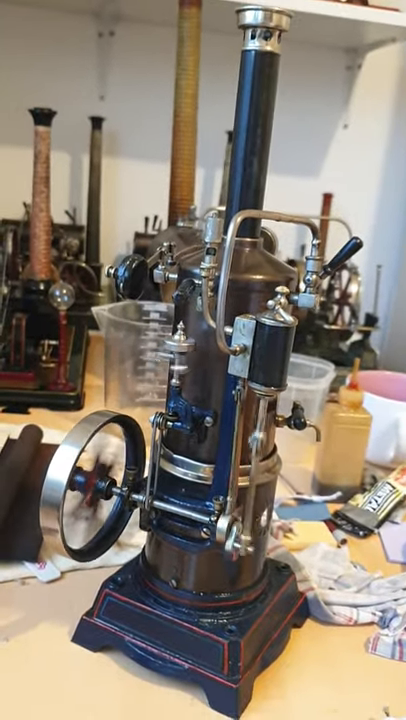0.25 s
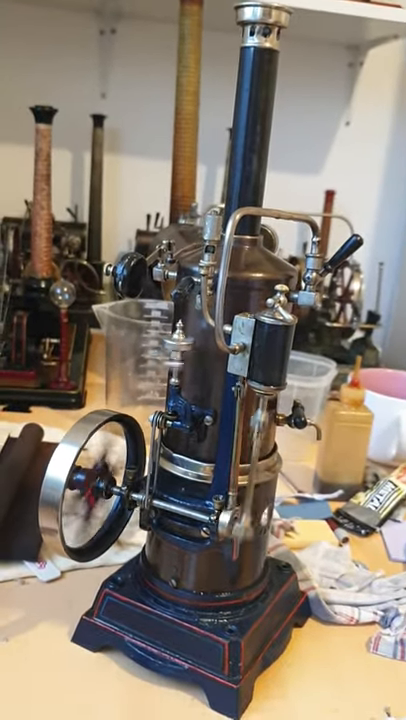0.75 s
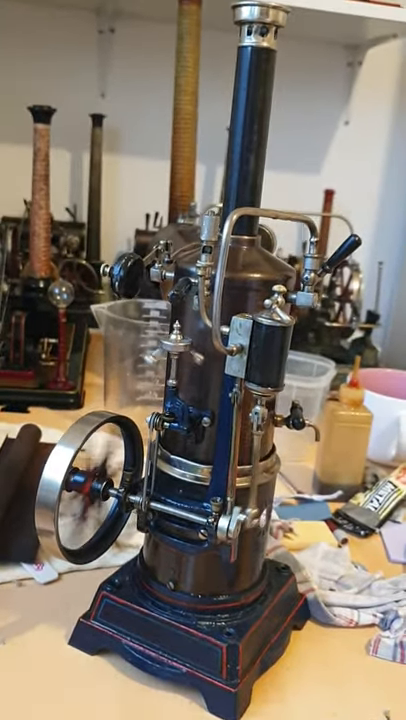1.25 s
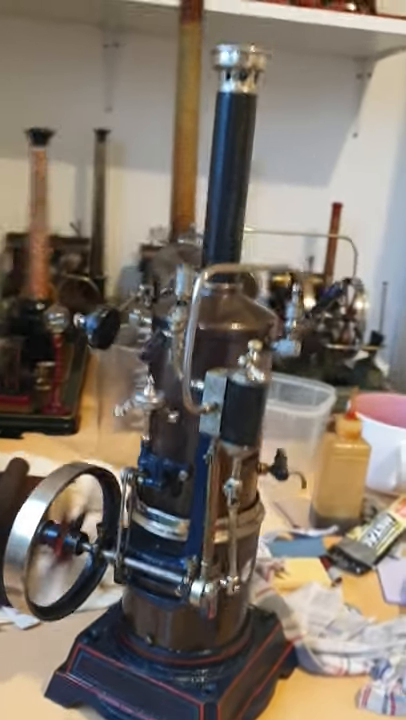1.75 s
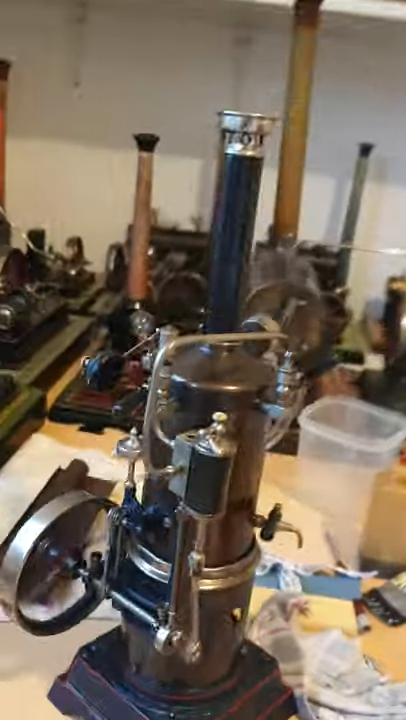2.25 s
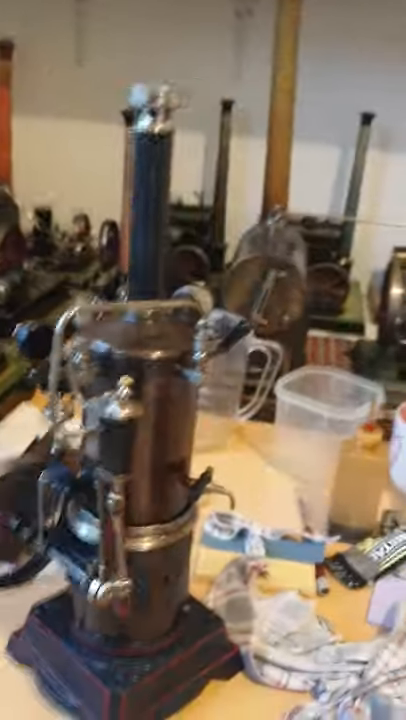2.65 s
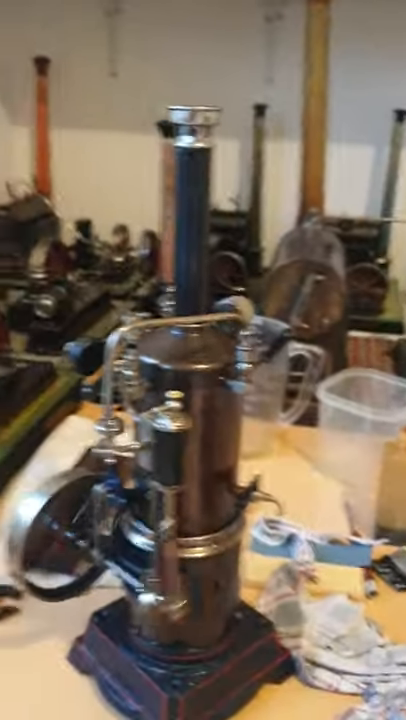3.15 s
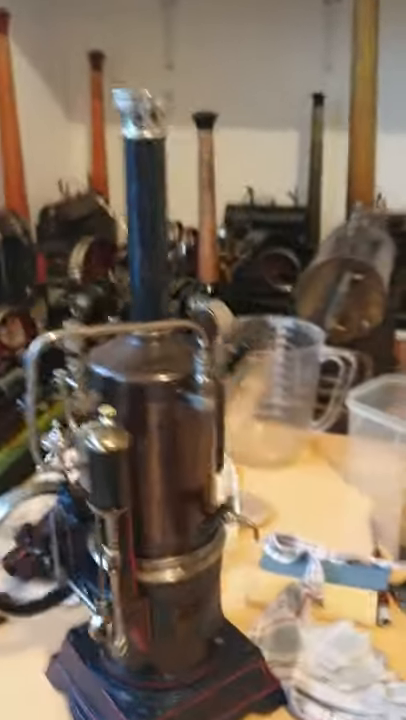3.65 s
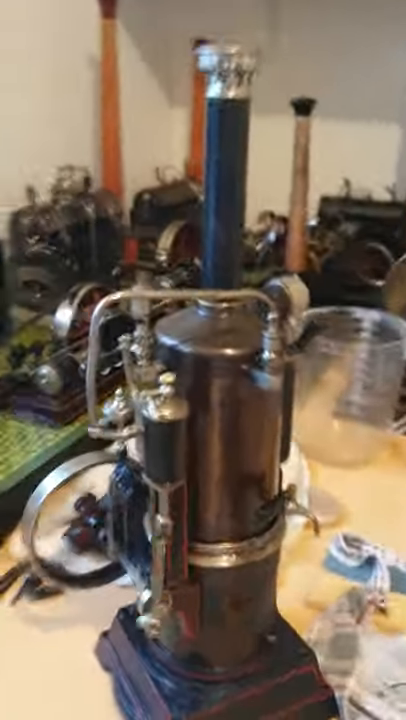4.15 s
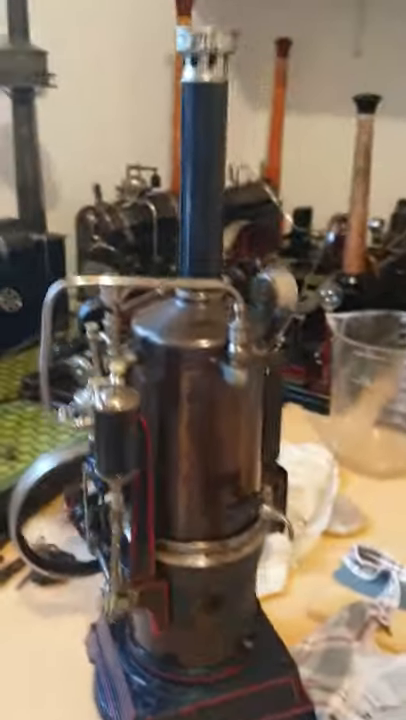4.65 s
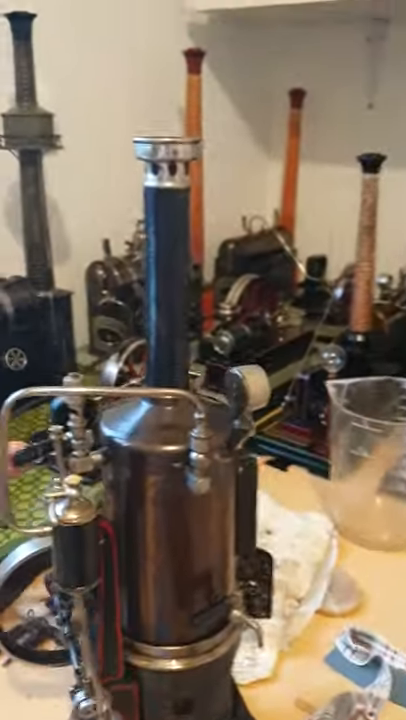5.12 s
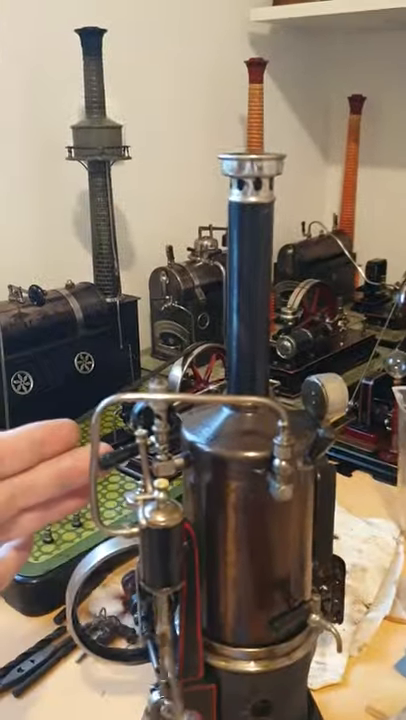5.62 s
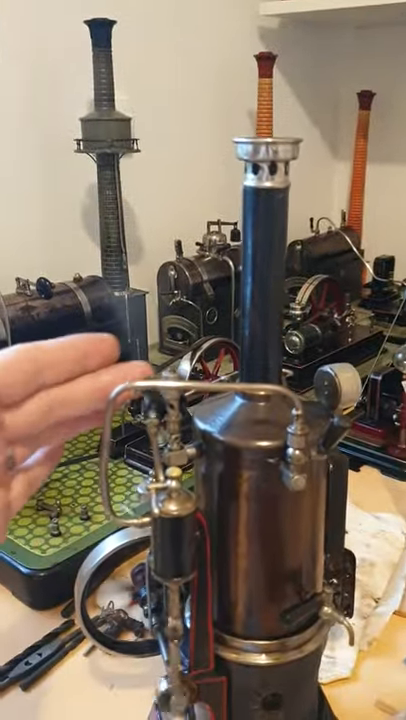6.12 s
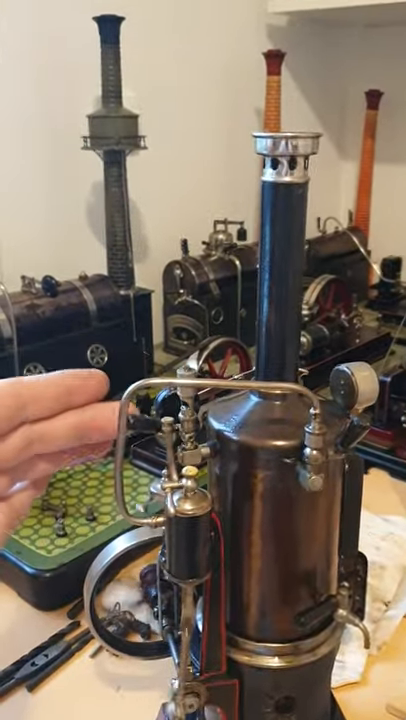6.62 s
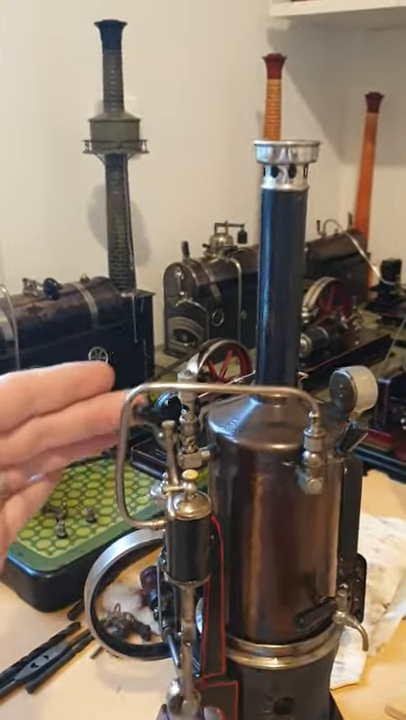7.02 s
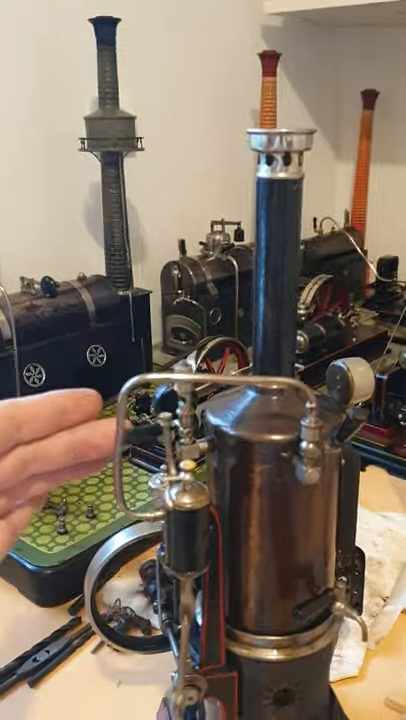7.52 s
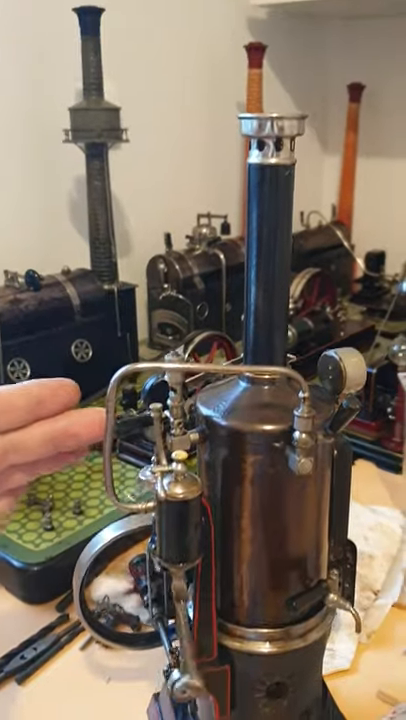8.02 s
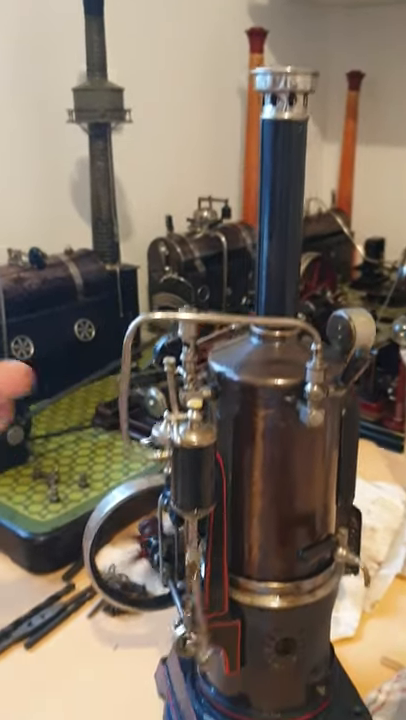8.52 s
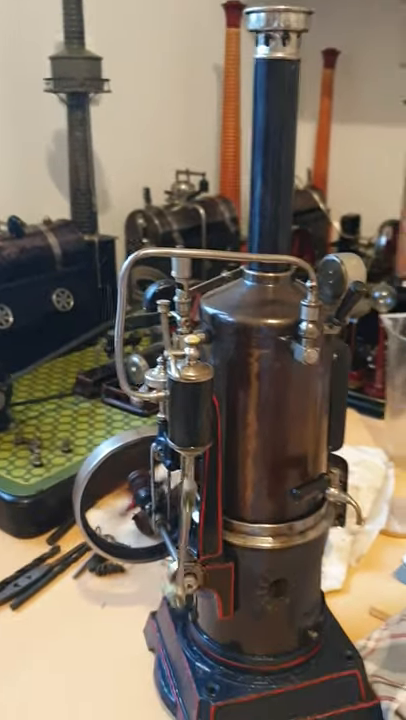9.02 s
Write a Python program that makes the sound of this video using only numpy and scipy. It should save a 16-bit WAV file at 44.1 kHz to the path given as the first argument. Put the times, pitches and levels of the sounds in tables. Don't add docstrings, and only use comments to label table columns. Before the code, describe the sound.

A toy steam engine runs steadily on a workbench, about five or six turns a second, with dull metallic knocks, valve ticks, loose linkage clatter and leaking steam. After six seconds a very high, breathy whistle toots loudly, then again more briefly. The phone's gain ducks, so the engine drops far back and only partly recovers. Close handheld stereo microphone in a bare, lightly echoing room.

```python
import sys
import numpy as np
from scipy import signal
from scipy.fft import rfft, irfft, next_fast_len
from scipy.io import wavfile
from scipy.ndimage import uniform_filter1d, map_coordinates

SR = 44100
rng = np.random.default_rng(int(sys.argv[2]) if len(sys.argv) > 2 else 0)


def rack_gain(trim_db):
    fader = np.asarray(trim_db, float)
    return 10 ** (fader / 20)


def generate_wav(signal):
    frames = np.transpose(np.atleast_2d(signal))
    scaled = np.clip(frames, -1, 1) * 32767
    pcm = np.round(scaled).astype(np.int16)
    wavfile.write(sys.argv[1], SR, pcm)


N = 408807
T = np.arange(N) / SR

# t/s at dead centre, turns done
CRANK = [(.0633, 0), (1.679, 9), (2.57, 14), (3.635, 20), (4.692, 26), (5.924, 33), (6.809, 38),
         (7.543, 42), (8.654, 48), (9.216, 51)]
# t/s, peak
# level/dB
KNOCKS = [(0.0646, -30), (0.2447, -28), (0.4244, -30), (0.6041, -33), (0.7811, -37), (0.9619, -29),
          (1.1402, -26), (1.3209, -34), (1.4993, -29), (1.6798, -30), (1.8601, -30), (2.0355, -31),
          (2.2144, -32), (2.3919, -29), (2.5703, -29), (2.7506, -34), (2.925, -31), (3.1021, -31),
          (3.2795, -30), (3.4605, -32), (3.635, -30), (3.8115, -29), (3.9886, -34), (4.1654, -30),
          (4.3399, -27), (4.517, -28), (4.6921, -28), (4.8673, -30), (5.0438, -29), (5.2193, -27),
          (5.3951, -28), (5.5711, -29), (5.7479, -30), (5.924, -30), (6.1034, -32), (6.2777, -45),
          (6.4547, -51), (6.6296, -58), (6.8102, -57), (6.9954, -51), (7.1785, -48), (7.3616, -47),
          (7.5432, -49), (7.7265, -49), (7.9133, -45), (8.0979, -46), (8.2844, -45), (8.4689, -47),
          (8.6543, -44), (8.8419, -40), (9.0302, -42), (9.2167, -42)]
# angle/turn, frame knock/dB, bench push/dB, valve tick/dB, scatter/dB
CONTACTS = [(0, 2, -7.5, -32.5, 0.5), (.036, -1.5, -8, -32.5, 0.5846), (0.099, -5.5, -7, -33, 0.5),
            (0.157, -8, -8, -26.5, 1), (0.208, -12.5, -14, -32.5, 2), (0.301, -15, -10.5, -25.5, 2),
            (0.519, -11, 1.5, -11.5, 2), (.58, -10, -9.5, -10.5, 2), (.625, -4.5, 1.5, -11.5, 2),
            (0.761, -10.5, 2.5, -22, 2.5), (0.966, -20.5, -14.5, -17.5, 2)]
# f/Hz, width/Hz, level/dB
CRANK_SIDE = [(235, 130, -3), (377.74, 16, 5.5), (432.17, 26, 5), (557.4, 35, 3), (662.3, 100, -3),
              (784.3, 42, 0.5), (926, 120, -8.5), (1150, 200, -16), (1600, 300, -18.5), (2520, 170, -33)]
PISTON_SIDE = [(215.05, 110, -6), (375.3, 25.7, -0.5), (589, 43.5, 1), (702.5, 77, 1), (752.9, 45, -2),
               (886.7, 46, 0), (1084.7, 30, -4), (1250, 160, -14), (1700, 150, -14), (2100, 340, -18.5)]
# f/Hz, width/Hz, level/dB
HOLLOW_BASE = [
    [(560, 26, 4), (660.4, 27, 6), (777.6, 19, 8)],
    [(700, 26, 6), (900, 30, 2), (1085, 26, 0)],
]
# f/Hz, width/Hz, level/dB
BENCH = [(111.83, 15.63, 2), (193.7, 34, -14.5)]
VALVE = [(6030, 500, 1.5), (7600, 500, -11), (14520, 700, 2.5)]
DRONE = [(112.03, 7.5, 0)]
# t/s, share of the cylinder side, loss by distance from the bench/dB
WALK = [
    (0, 0.073, 0),
    (.6, 0.068, 1),
    (2, 0.075, 2),
    (2.8, 0.306, 1.5),
    (4.4, 0.785, 2.5),
    (5.6, 0.787, 3.5),
    (7.6, 0.732, 4.5),
    (9.3, 0.74, 3),
]
# t/s, gain/dB
GAIN = [(6.15, 0), (6.27, -13.5), (6.5, -19.5), (6.72, -21), (7.08, -20), (7.27, -17.5), (7.45, -17.5),
        (8.5, -16.5), (8.66, -12), (9.05, -12.5), (9.27, -12)]
# t/s, f/Hz, level/dB
TOOTS = [
    [(6.085, 4155, -91), (6.168, 5290, -33), (6.19, 5653, -12), (6.228, 5950, -9.5), (6.33, 5985, -15),
     (6.42, 5900, -13), (6.472, 5570, -22), (6.494, 5150, -37), (6.515, 4300, -62)],
    [(7.16, 4900, -87), (7.182, 5289, -40), (7.202, 5598, -19), (7.24, 5855, -14), (7.3, 5755, -15.5),
     (7.345, 5620, -23), (7.366, 5350, -42), (7.38, 5000, -60), (7.4, 4606, -93)],
]
# t/s, level/dB
WHISTLE_FLOW = [
    [(6.075, -95), (6.092, -48.5), (6.14, -41.5), (6.175, -32), (6.255, -32.5), (6.285, -39), (6.43, -40.5),
     (6.55, -61.5), (6.75, -90.5)],
    [(7.12, -95.5), (7.14, -61.5), (7.19, -49), (7.25, -44.5), (7.35, -45.5), (7.42, -60.5), (7.5, -73),
     (7.6, -94)],
]
# t/s, half length/s, level/dB, pitch change/Hz
CHOKES = [
    (6.175, 0.0106, -10, 0),
    (6.202, .0045, -18, 0),
    (6.268, .018, 0, -110),
    (6.283, .003, -12, 0),
    (6.332, .003, -10, 0),
    (6.365, .012, -7, 0),
    (6.396, 0.004, -12, -30),
    (7.197, .003, -8, 0),
    (7.316, .005, -10, 0),
]
# start t/s, end t/s, level/dB at the end, swell/(dB/s)
CONDENSATE = (6.094, 6.17, -36, -20)
# start t/s, end t/s, level/dB at the end, swell/(dB/s)
GUSTS = [
    (6.09, 6.451, -44, 29.5),
    (7.24, 7.349, -54.5, -10),
]
# f/Hz, level/dB
JET_HISS = [(1500, -120), (2400, -30), (4300, -7.5), (7000, 10.5), (9000, -1), (11000, 3), (13500, 4.5),
            (15800, 2), (17000, -120)]
JET_ROAR = [(200, -39.5), (600, -9), (1300, -4.5), (2200, 1), (3400, -8), (4500, -7.5), (7000, -120)]
# f/Hz, difference/dB
JET_SIDES = [(3000, 10), (6000, 0), (7500, 6.5), (9000, 24), (10300, 14), (11500, 8), (13000, 8.5)]
SIDES = [(60, -2), (110, 1), (200, -8.5), (380, 22), (700, 9), (1290, -2), (2380, 0), (4400, 2.5),
         (8120, 10), (15000, 6.5)]
# f/Hz, likeness
ALIKE = [(60, 0.96), (180, 1), (550, 0.853), (1650, 0.0), (4970, 0.0019), (15000, 0.087)]
# angle/turn, rattle/dB, leak/dB
ROUND = [(0, 9, 3), (.15, 7.5, -0.5), (.3, 5, -1), (.47, 0.5, -0.5), (.56, 8.5, 2), (.63, 7.5, 4),
         (.8, 7.5, 2.5), (.93, 3, 2.5), (1, 1, 3.5)]
# f/Hz, width/Hz, level/dB
LINKAGE = [(1650, 420, -4), (2300, 400, -2.5), (4000, 1593, -7), (7680, 900, -8), (13500, 3040, -10)]
# t/s, peak level/dB, f/Hz
CLINKS = [(0.5338, -40, 1560), (0.7577, -36.5, 1440), (1.069, -33, 1570), (1.1911, -36, 1548),
          (1.9628, -39.5, 1440), (2.4541, -38.5, 1940), (2.507, -36, 1580), (3.4575, -41, 1810),
          (3.8127, -38, 1350), (4.1669, -38.5, 1280), (4.3405, -38, 1696), (4.9267, -37.5, 1790),
          (5.7974, -34, 2194), (5.9843, -43, 2360), (6.0145, -46, 2230), (6.0305, -30, 2064),
          (6.6815, -51, 2040), (6.7791, -50, 1480), (6.922, -50, 2270), (7.6125, -56.5, 2230),
          (7.6536, -53.5, 1430), (7.6784, -54, 1520), (7.7772, -55, 2000), (8.0082, -56.5, 2070),
          (8.4362, -54.5, 1394), (8.6971, -50.5, 2046), (9.0236, -54, 1255), (9.124, -54, 2070),
          (9.1404, -51, 1320), (9.2095, -54.5, 1200)]
TICKS = [(0.1526, -39.5, 2182), (0.3315, -38.5, 2210), (0.5126, -30, 1621), (0.5962, -36.5, 2491),
         (0.6933, -42.5, 1780), (0.7755, -39, 2490), (0.8726, -42.5, 1540), (1.2496, -38, 1509),
         (1.4568, -38, 2170), (1.5888, -40.5, 1590), (1.7679, -41, 5770), (2.0043, -33.5, 2061),
         (2.1257, -41.5, 1869), (2.3153, -41.5, 1890), (2.8722, -29.5, 1571), (2.8986, -30, 1570),
         (3.027, -39, 1840), (3.2724, -38, 1611), (4.8375, -36, 2003), (4.9049, -30, 2388),
         (4.9566, -36, 2089), (5.0364, -39, 2190), (5.3088, -36.5, 1691), (5.4844, -41, 2034),
         (5.5308, -36, 1992), (5.7478, -38.5, 2071), (5.7793, -31.5, 2120), (5.8805, -35, 2220),
         (6.9085, -49.5, 2001), (6.9554, -52, 3160), (7.8244, -55, 1995), (8.0564, -57, 2370),
         (8.2404, -59, 2000), (8.3795, -56.5, 2170), (8.5325, -54.5, 2010), (8.5644, -55, 2070),
         (8.5789, -51.5, 2070), (8.6134, -54.5, 1830), (8.7944, -50.5, 4540), (8.9294, -53, 1500),
         (8.9545, -51, 1727)]
# t/s, peak level/dB, ring f/Hz, top part/dB, left-right/dB
SPITS = [(0.2367, -36.5, 3400, -9, 9.5), (0.5336, -32, 5510, -21.5, 12), (1.0505, -44.5, 5960, -17, 4),
         (1.0673, -34.5, 3180, -18, 13), (1.1908, -27.5, 4950, -21, 11), (1.2687, -30, 4100, -14.5, 14),
         (1.4227, -34.5, 5940, -18, 6), (1.6301, -35.5, 4970, -12.5, 11), (1.8123, -31, 4840, -19, 6.5),
         (1.9287, -33.5, 7530, -21, 7), (2.4915, -30, 3160, -17.5, -11.5), (2.501, -37.5, 1600, -20, -5),
         (2.7985, -36.5, 7400, -25, 12), (2.8544, -29, 4128, -20.5, -5.5), (2.9179, -44, 3980, -11.5, -7),
         (3.0708, -31, 4350, -15.5, -6), (3.146, -34.5, 4450, -27.5, -0.5), (3.8648, -30, 4332, -20, -1.5),
         (4.4009, -34, 5630, -12.5, 9.5), (4.4677, -29, 4000, -17.5, 5.5),
         (4.9275, -34.5, 6905, -18.5, 10.5), (3.4121, -41, 3540, -18, -2), (4.0073, -42, 5070, -18, 4),
         (4.2921, -41, 3190, -18, 4), (4.8374, -41, 2980, -15, 8), (2.3032, -43, 7400, -18, 8),
         (4.972, -41, 2600, -15, 4), (5.7972, -33.5, 4308, -17, 6), (6.03, -30, 3727, -20.5, 8.5)]
# t/s, peak level/dB, f/Hz
THUDS = [(0.767, -34, 185), (1.236, -33, 122), (1.261, -33.5, 137.3), (1.32, -26, 196.7),
         (2.4912, -28.5, 70), (2.502, -33, 418.4), (2.883, -33, 105.6), (2.909, -35.5, 61.9),
         (3.792, -32, 61.9), (3.854, -35.5, 120), (4.246, -27, 177.4), (4.269, -32.5, 61.9),
         (6.243, -46, 117.5), (6.284, -37, 127.8), (6.358, -36.5, 78.1), (6.399, -50.5, 62.02),
         (7.251, -54, 61.9), (7.284, -47.5, 91.55)]
# t/s, peak level/dB, width/s, left-right/dB
CASE_CRACK = (2.49145, -22, 0.00007, -22)
# t/s, length/s, level/dB,
# centre f/Hz
SPURTS = [(0.537, 0.072, -58.5, 5000), (1.195, 0.054, -54.5, 4200), (1.273, .06, -53, 3000),
          (2.492, 0.054, -49.5, 2600), (2.495, 0.068, -52.5, 4500), (2.583, 0.055, -48, 4500),
          (4.464, 0.074, -49.5, 4300), (5.052, 0.173, -49.5, 4460), (.755, 0.0364, -48, 1600),
          (.94, 0.041, -43.5, 1600), (1.27, 0.036, -46.5, 1600), (4.95, .06, -52, 2200),
          (1.28, .06, -57.5, 12640), (1.632, 0.039, -53.5, 5200), (2.85, .05, -47.5, 4300),
          (6.68, 0.042, -60, 2100), (8.38, .07, -67.5, 2300), (8.697, .04, -60, 2400)]
# t/s, flow/dB
LEAK = [(0, -4), (.85, -4), (1.23, 2), (1.5, -4), (1.85, -1), (2.25, -2.5), (2.6, 2.5), (3.0, -1), (3.3, 2),
        (3.75, -1.5), (4.0, 1), (4.7, -0.5), (5.05, 2), (5.35, 0), (6.0, 4.5), (6.85, 6.5), (7.5, 1.5),
        (8.6, 1.5)]
# first stroke/dB, second stroke/dB
PUFFS = [(1.5, 0.5), (-1.0, -0.5), (0, 0.5), (-1.5, 1.5), (-1.5, -0.5), (0.5, 2), (1.5, -0.5), (-2.5, 2.5),
         (-0.5, 1), (0.5, 1.5), (-1.5, 1.5), (0.0, 4.5), (-1, 1.5), (-1.5, 0.5), (-1, 2), (4, 0.5),
         (1, 0.5), (0, 1.0), (1.0, 1), (0.5, 0), (-1, 1), (0.5, -1), (0, 1.5), (2.5, -1), (-1.0, 0),
         (0, -1), (0.5, -1.0), (-2, -1), (3, 1), (1.0, 0), (1.5, 2), (-1.5, -1), (0.5, -1.5), (3.5, 1.0),
         (-1.5, -2.5), (1, 0.5), (1.5, -0.5), (0.5, -1.5), (0.0, 1), (0.5, 1.5), (-1, -1.0), (2, -0.5),
         (-1, -0.5), (0.0, 0.5), (1, 0.5), (-2.5, 0.5), (-1, -1.5), (-3.5, -2), (3.0, -1), (1.5, 1.5),
         (-0.5, -0.5), (-1.5, 0), (-1.5, 0.0)]
# f/Hz, level/dB
HISS = [(1760, -43), (3000, -6), (4910, -1), (6530, -9), (7550, -4.5), (9040, -13.5), (14400, -5.5),
        (15800, -11)]
SEETHE = [(590, -6), (1000, -7), (1340, -4), (1660, -5), (2490, -5), (3150, -11.5), (4910, -16),
          (5500, -23), (7150, -47), (12100, -120)]
RUMBLE = [(20, -120), (33, -19.5), (47, 3), (70, 1), (150, -13), (330, -10.5), (480, -21), (700, -120)]
# f/Hz, decay time (60 dB)/s
ROOM = [(200, 0.43), (2000, 0.65), (6000, 0.53), (12000, 0.354)]
# t/s, left-right/dB
PHONE_TURN = [
    (0, 0.5),
    (2.5, 0),
    (4.5, 0.54),
    (9.3, 1.33),
]

RATTLE_DB, RATTLE_FADES = -42.5, 0.838
BASS_DB, BASS_FADES = 2, 2.478
SEETHE_DB, HISS_DB, HISS_GROWS, HISS_SCREENED_DB = -11.3, -18.5, 0.82, -2.5
CONDENSATE_EDGE = 899.5


def unit(x):
    return x / np.sqrt(np.mean(x ** 2) + 1e-20)


def along(points, hz):
    f, v = np.transpose(points)
    return np.interp(np.log(hz + 1), np.log(f + 1), v)


def curves(rows, at=T):
    s, *cols = np.transpose(rows)
    return [np.interp(at, s, c) for c in cols]


def wobble(rate):
    knots = rng.standard_normal(int(N * rate / SR) + 4)
    return map_coordinates(knots, [T * rate], order=3)


def filtered(x, response):
    m = next_fast_len(N + SR // 2)
    return irfft(rfft(x, m) * response(np.fft.rfftfreq(m, 1 / SR)), m)[..., :N]


def ringing(x, modes, sign=-1):
    def response(f):
        total = 0
        for k, (centre, width, db) in enumerate(modes):
            damping = 1j * f * width
            total = total + sign ** k * rack_gain(db) * damping / (centre * centre - f * f + damping)
        return total
    return filtered(x, response)


def blows(s, db):
    at = np.round(np.ravel(s) * SR).astype(int)
    inside = (at >= 0) & (at < N)
    return np.bincount(at[inside], rack_gain(np.ravel(db))[inside], N)


def left_right(db):
    return rack_gain(np.array([[.5], [-.5]]) * db)


def lean(sides, hz):
    return left_right(along(sides, hz))


def pair(alike):
    def mid_side(hz):
        turn = np.arccos(np.clip(along(alike, hz), -1, 1)) / 2
        return np.array([np.cos(turn), np.sin(turn)])
    mid, side = filtered(rng.standard_normal((2, N)), mid_side)
    return np.array([mid + side, mid - side])


def rush(spectrum, sides, alike=ALIKE):
    return unit(filtered(pair(alike), lambda hz: rack_gain(along(spectrum, hz)) * lean(sides, hz)))


def patchy(x, depth_db):
    z = signal.stft(x, nperseg=256)[2]
    field = uniform_filter1d(rng.standard_normal(z.shape[1:]), size=7, axis=0)
    field = uniform_filter1d(field, size=9, axis=1)
    return signal.istft(z * rack_gain(depth_db * unit(field)), nperseg=256)[1][:, :N]


def swell(start, end, db, db_per_s, edge_db_per_s):
    outside = np.maximum(start - T, 0) + np.maximum(T - end, 0)
    return db + db_per_s * (np.clip(T, start, end) - end) - edge_db_per_s * outside


def place(out, s, sound):
    out[:, round(s * SR):][:, :sound.shape[-1]] += sound


def crank():
    s, turns = np.transpose(CRANK)
    s = np.interp(np.arange(turns[-1] + 1), turns, s)
    s = np.r_[2 * s[0] - s[1], s, 2 * s[-1] - s[-2]]
    return s, np.interp(T, s, np.arange(len(s))) % 1


def running(at=T):
    share, far_db = curves(WALK, at)
    flow_db, = curves(LEAK, at)
    run_db = RATTLE_DB - RATTLE_FADES * far_db + curves(GAIN, at)[0]
    hiss_db = HISS_DB + HISS_GROWS * flow_db + HISS_SCREENED_DB * share
    return run_db, BASS_DB - BASS_FADES * far_db, SEETHE_DB + flow_db, hiss_db


def by_side(force, crank_modes, piston_modes, sign):
    share = np.clip(curves(WALK)[0], 0, 1)
    crank_side = np.sqrt(1 - share) * ringing(force, crank_modes, sign)
    return crank_side + np.sqrt(share) * ringing(force, piston_modes, sign)


def knocks():
    s = crank()[0]
    angle, frame_db, bench_db, valve_db, scatter_db = np.transpose(CONTACTS)
    chance = np.clip(rng.standard_normal((len(s) - 1, len(angle), 4)), -2, 2)
    when = s[:-1, None] + np.diff(s)[:, None] * (angle + .003 * scatter_db * chance[..., 0])
    knock_s, knock_db = np.transpose([(s[0], KNOCKS[0][1])] + list(KNOCKS))
    bounce = angle < .25
    when = when + np.where(bounce, (knock_s - s[:-1])[:, None], 0)
    run_db, bass_db, _, _ = running(when)
    level_db = np.where(bounce, knock_db[:, None] + 2.5, run_db + 16)
    force = blows(when, level_db + frame_db + scatter_db * chance[..., 1] + 26.5)
    force = signal.lfilter(*signal.butter(2, (450, 960), "band", fs=SR), force)
    body = by_side(force, CRANK_SIDE, PISTON_SIDE, 0.949)
    hollow = by_side(force, *HOLLOW_BASE, 0.936)
    push_db = run_db + bass_db + bench_db + scatter_db * chance[..., 2] + 53.5
    bench = ringing(blows(when, push_db), BENCH)
    hidden_db = -7 * curves(WALK, when)[0]
    tick_db = run_db + hidden_db + valve_db + 1.045 * scatter_db * chance[..., 3] + 32.0
    return body + hollow + bench + ringing(blows(when, tick_db), VALVE)


def whistle():
    hz, tone_db = curves(sum(TOOTS, []))
    shut_s = 6.515
    closing = (T > shut_s) & (T < shut_s + .5)
    tone_db = np.where(closing, tone_db - 900 * (T - shut_s), tone_db)
    for s, half, db, sag_hz in CHOKES:
        choke = np.exp(-((T - s) / half) ** 4)
        hz, tone_db = hz + sag_hz * choke, tone_db + db * choke
    phase = 2 * np.pi * np.cumsum(hz + 25 * wobble(90) + 22 * wobble(300)) / SR
    tone = rack_gain(tone_db + 2.18 * wobble(70)) * np.sin(phase)
    octave_db = tone_db - 18.5 + 0.007 * (hz - 5900)
    octave = rack_gain(octave_db + 2.5 * wobble(40)) * np.sin(2 * phase)
    air = rng.standard_normal((2, N))
    flutter = signal.lfilter(*signal.butter(3, 1000, fs=SR), air)
    skirt = signal.lfilter(*signal.butter(3, 300, fs=SR), air)
    tone = tone + rack_gain(tone_db - 19) * unit(skirt[0] * np.cos(phase) + skirt[1] * np.sin(phase))
    flow_db, = curves(sum(WHISTLE_FLOW, []))
    breath = rack_gain(flow_db) + rack_gain(swell(*CONDENSATE, CONDENSATE_EDGE))
    return tone, octave, breath * unit(flutter[0] * np.sin(phase) + flutter[1] * np.cos(phase))


def jet():
    flow_db, = curves(sum(WHISTLE_FLOW, []))
    grain = rack_gain(1.5 * wobble(60))
    hiss = rack_gain(flow_db + 3.5) * rush(JET_HISS, JET_SIDES, [(3000, 0.198)])
    roar = rack_gain(flow_db - 11.5) + rack_gain(swell(*CONDENSATE, CONDENSATE_EDGE) - 5)
    draught = sum(rack_gain(swell(*gust, 300)) for gust in GUSTS)
    lumps = rack_gain(4.5 * wobble(25))
    buffet = draught * rack_gain(-3.5) * unit(lumps * rush(RUMBLE, [(100, 0)], [(30, .4)]))
    return grain * (hiss + roar * rush(JET_ROAR, SIDES)) + buffet


def rattle():
    rattle_db = curves(ROUND, crank()[1])[0]
    run_db, bass_db, _, _ = running()
    grit = rack_gain(2.5 * wobble(160))
    shake = unit(by_side(grit * pair(ALIKE), CRANK_SIDE, PISTON_SIDE, -1.0457))
    shake = rack_gain(run_db + rattle_db - 6.5) * shake
    hum = rack_gain(run_db + bass_db + rattle_db - 10.5) * unit(ringing(pair(ALIKE), BENCH))
    drone = rack_gain(run_db + bass_db - 6) * unit(ringing(rng.standard_normal(N), DRONE))
    rumble_db = run_db + .4 * bass_db - 13.2 + 2.5 * wobble(23)
    return shake + hum + drone + rack_gain(rumble_db) * rush(RUMBLE, SIDES, [(30, 0.48), (300, 0.96)])


def clatter():
    draw = rng.random((int(258.7 * N / SR), 4))
    s = draw[:, 0] * N / SR
    run_db, _, seethe_db, _ = running(s)
    leak_db = curves(ROUND, np.interp(s, T, crank()[1]))[1]
    db = run_db + seethe_db + 1.5 * leak_db + 24 - 5 * np.log(draw[:, 1] + .1)
    pan_db = 8 * (draw[:, 2] - .5)
    part = (draw[:, 3] * len(LINKAGE)).astype(int)
    out = np.zeros((2, N))
    for k, (hz, width, part_db) in enumerate(LINKAGE):
        own = part == k
        ticks = [blows(s[own], (db + part_db + side * pan_db)[own]) for side in (1, -1)]
        out += signal.lfilter(*signal.iirpeak(hz, hz / width, fs=SR), ticks)
    return out


def clinks():
    out, t = np.zeros((2, N + SR)), np.arange(SR // 8) / SR
    ticks = [(s, min(db, -34) - 8, hz) for s, db, hz in TICKS]
    for s, db, hz in CLINKS + ticks:
        modes = hz * np.exp(rng.normal(0, .4, (3, 1))) ** [[0], [1], [1]]
        ring = ([[1.3], [.4], [.4]] * np.sin(2 * np.pi * modes * t)).sum(0) * rack_gain(-60 * t / 0.0192)
        near = signal.butter(1, (hz * 0.63, hz * 1.7), "band", fs=SR, output="sos")
        fade = rack_gain(-60 * t / 0.006) + .22 * rack_gain(-60 * t / .07)
        scrape = 1.6 * signal.sosfilt(near, rng.standard_normal((2, len(t)))) * fade
        place(out, s, rack_gain(db + 0.5) * (ring + scrape))
    return out[:, :N]


def spits():
    out, t = np.zeros((2, N + SR)), np.arange(SR // 8) / SR
    mid = signal.butter(2, (1500, 7400), "band", fs=SR, output="sos")
    top = signal.butter(2, (11000, 21000), "band", fs=SR, output="sos")
    for s, db, hz, top_db, pan_db in SPITS:
        fade = rack_gain(-60 * t / 0.0045) + 0.381 * rack_gain(-60 * t / 0.14)
        burst = rng.standard_normal((2, len(t))) * fade
        burst[:, 0] -= 2.5
        ring = 0.61 * np.sin(2 * np.pi * hz * t) * rack_gain(-60 * t / 0.0151)
        fizz = rack_gain(top_db + 13) * signal.sosfilt(top, burst)
        place(out, s, rack_gain(db - 2.5) * left_right(pan_db) * (ring + signal.sosfilt(mid, burst) + fizz))
    return out[:, :N]


def spurts():
    out = np.zeros((2, N + SR))
    for s, length, db, hz in SPURTS:
        u = np.arange(SR // 4) / SR / length
        band = signal.butter(2, (hz * .7, hz * 1.144), "band", fs=SR, output="sos")
        grain = rng.standard_normal((2, len(u))) * rng.exponential(size=len(u))
        envelope = np.exp(-u ** 3) * (1 - np.exp(-12 * u))
        place(out, s, rack_gain(db) * unit(signal.sosfilt(band, grain)) * envelope)
    return out[:, :N]


def thuds():
    out, t = np.zeros((2, N + SR)), np.arange(SR // 8) / SR
    for s, db, hz in THUDS:
        push = np.sin(2 * np.pi * hz * t) * rack_gain(-60 * t / 0.08) * (1 - np.exp(-t / 0.0054))
        place(out, s, rack_gain(db + 4.0) * push * [[.75], [1.25]])
    s, db, width, pan_db = CASE_CRACK
    return out[:, :N] - rack_gain(db) * left_right(pan_db) * np.exp(-np.abs(T - s) / width)


def leak():
    leak_db = curves(ROUND, crank()[1])[1]
    run_db, _, seethe_db, hiss_db = running()
    s = crank()[0]
    strokes = s[:-1, None] + np.diff(s)[:, None] * [.25, .75]
    puff_db = np.interp(T, strokes.ravel(), np.ravel(PUFFS))
    flow_db = run_db + leak_db + puff_db + 1.3 * wobble(11) + 1.5 * wobble(200)
    hiss = rack_gain(flow_db + hiss_db + 7.5) * patchy(rush(HISS, SIDES), depth_db=2.5)
    seethe_db = flow_db + seethe_db + 3.0 + 2.255 * wobble(500)
    return hiss + rack_gain(seethe_db) * patchy(rush(SEETHE, SIDES), depth_db=2.5)


def room(x, gap):
    hz, t, z = signal.stft(rng.standard_normal((2, SR)), SR, nperseg=256)
    tail = signal.istft(z * rack_gain(-60 * t / along(ROOM, hz)[:, None]), SR, nperseg=256)[1]
    late = np.pad(x, (int(gap * SR), 0))[None]
    return signal.fftconvolve(late, tail / np.linalg.norm(tail[0]), axes=1)[:, :N]


def ports(x, lag):
    return filtered(x, lambda hz: np.exp(1j * np.pi * hz * lag * np.array([[-1], [1]])))


def scene():
    tone, octave, breath = whistle()
    hits = knocks()
    near = np.array([rack_gain(3) * (tone + octave) + breath] * 2)
    near = filtered(near, lambda hz: lean(JET_SIDES, hz))
    engine = hits * left_right(-.6) + rack_gain(-4) * room(hits, 0.0047054)
    engine = engine + rattle() + clatter() + clinks() + spits() + spurts() + thuds() + leak()
    engine = ports(engine * left_right(curves(PHONE_TURN)[0]), 0.0001414)
    echo = rack_gain(2.6) * room(tone + rack_gain(-6) * octave + 0.3 * breath, .006)
    return engine + ports(near + jet(), -0.0005681) + echo


def band_limit(x):
    return signal.sosfilt(signal.butter(12, 16710, fs=SR, output="sos"), x)


def record(dry):
    heard = filtered(dry, lambda hz: (hz < 15870) / np.sqrt(1 + (42 / (hz + 1)) ** 8))
    held = heard / (1 + np.abs(heard / 1.05) ** 8) ** (1 / 8)
    return band_limit(held)


dry = scene()
out = record(dry)
generate_wav(out)
```